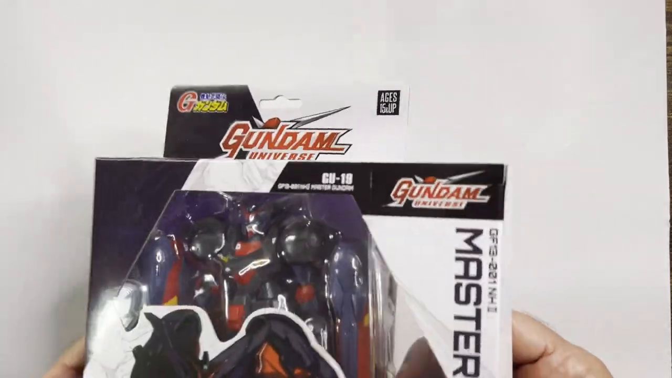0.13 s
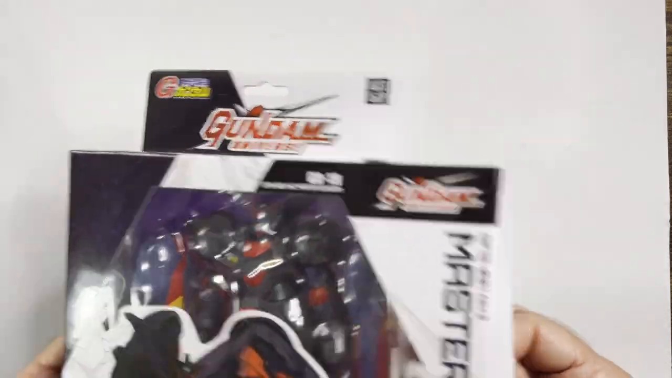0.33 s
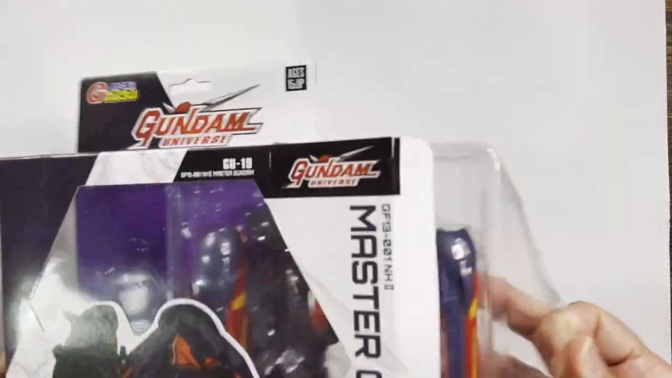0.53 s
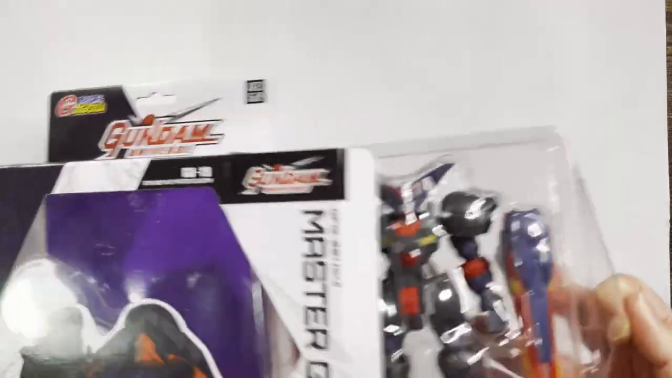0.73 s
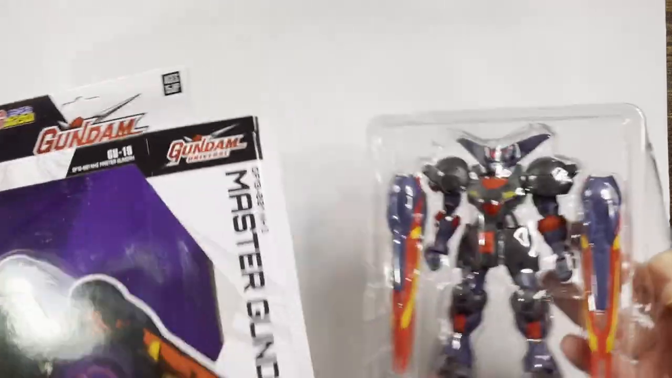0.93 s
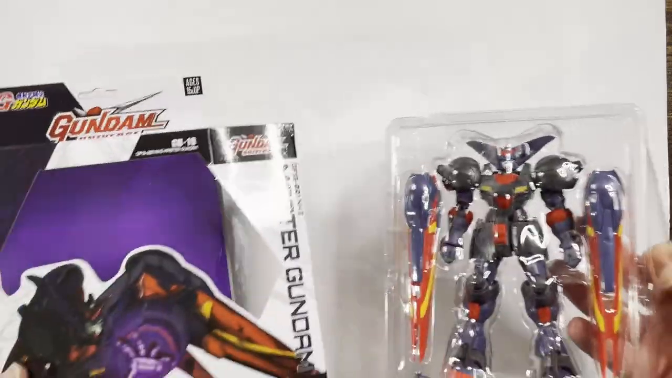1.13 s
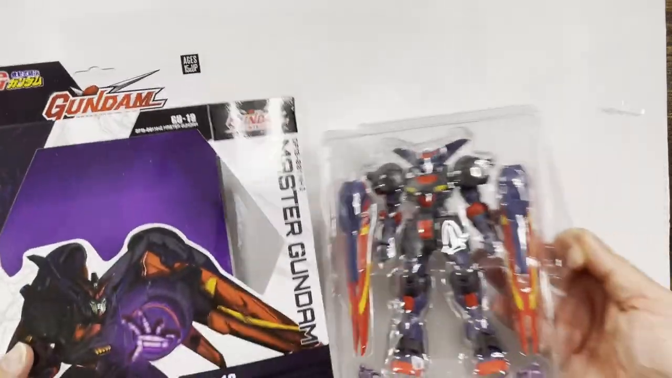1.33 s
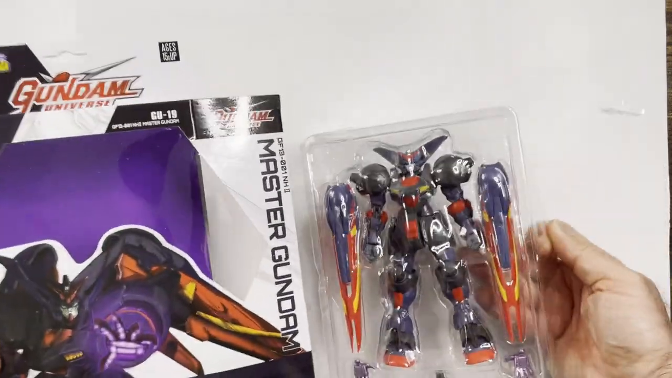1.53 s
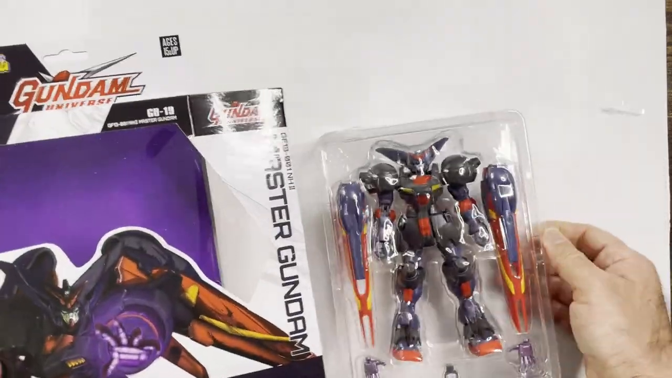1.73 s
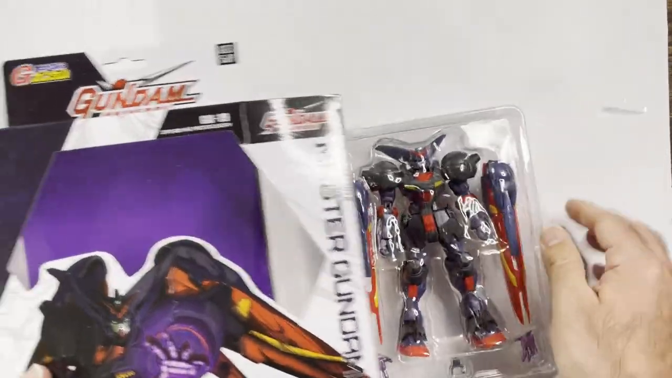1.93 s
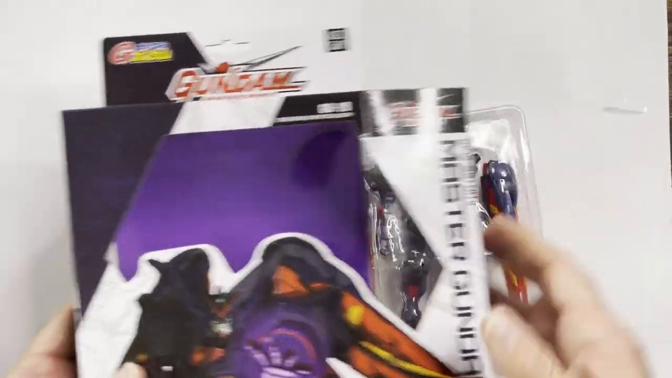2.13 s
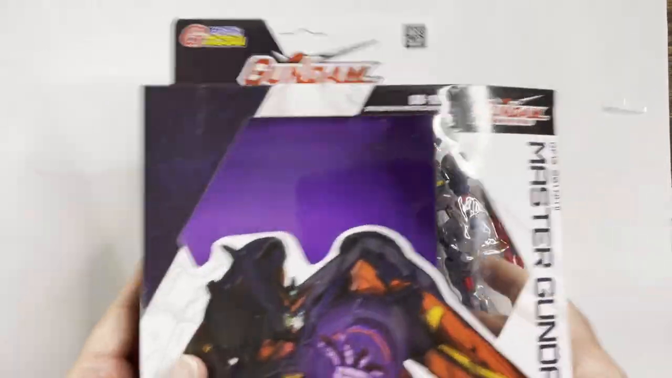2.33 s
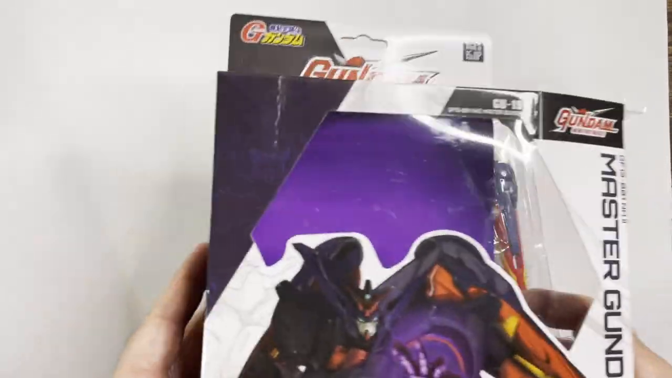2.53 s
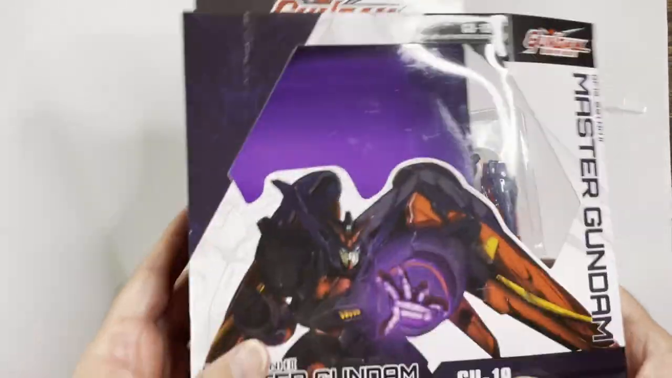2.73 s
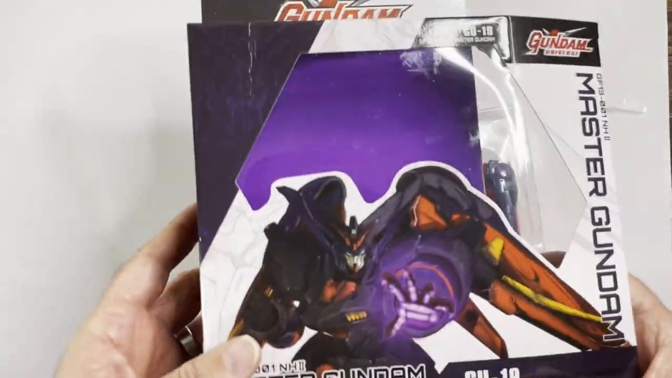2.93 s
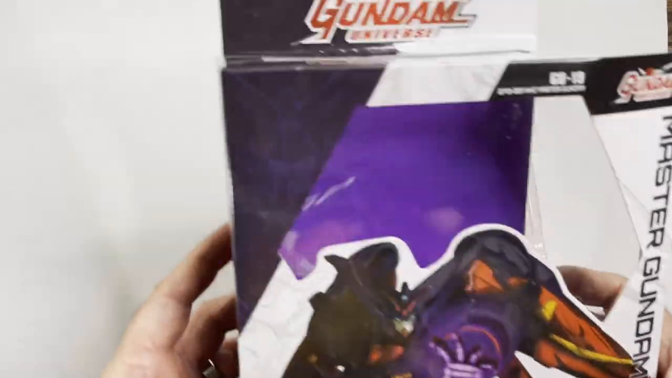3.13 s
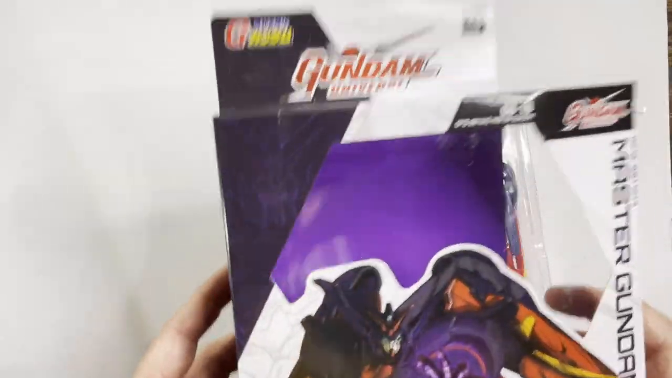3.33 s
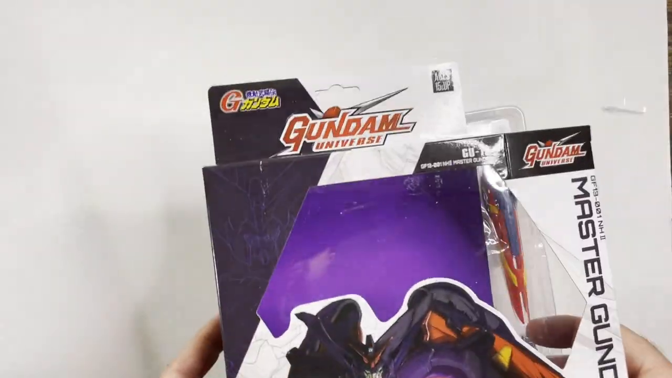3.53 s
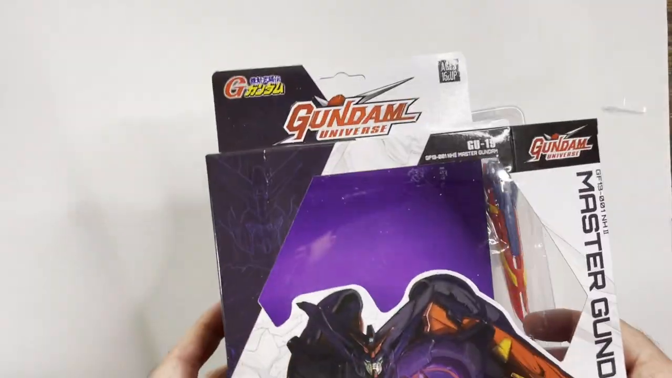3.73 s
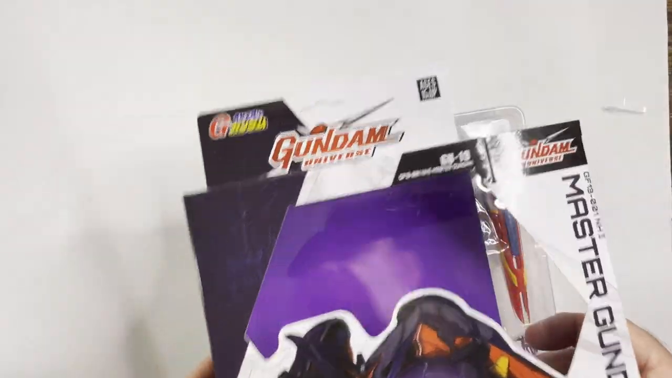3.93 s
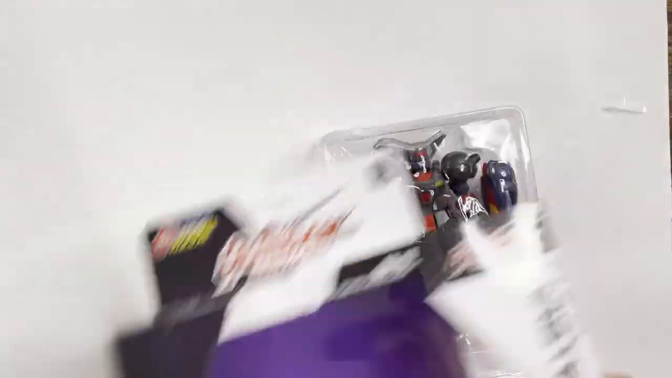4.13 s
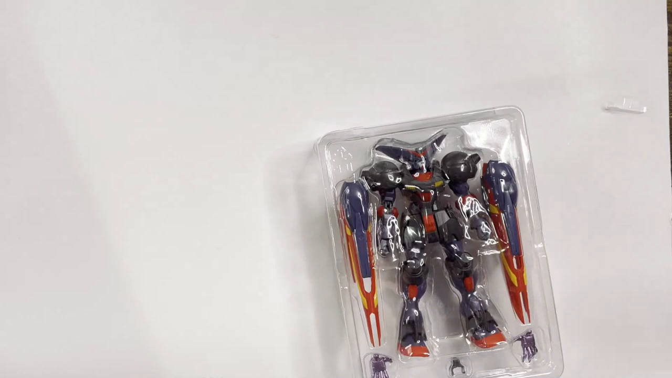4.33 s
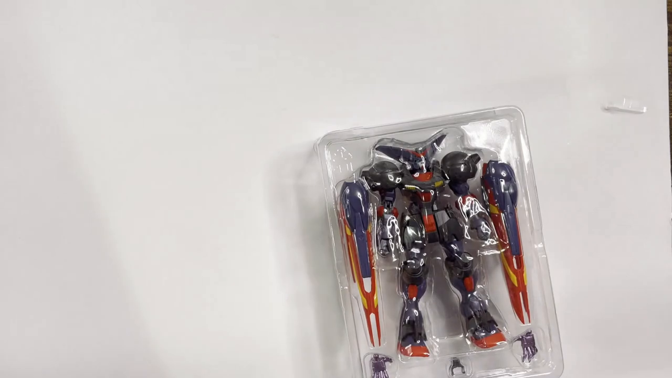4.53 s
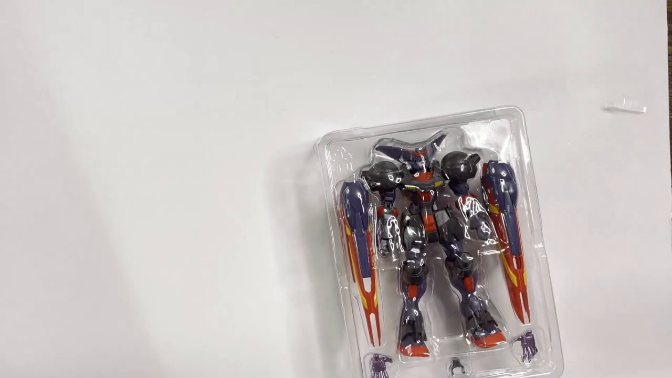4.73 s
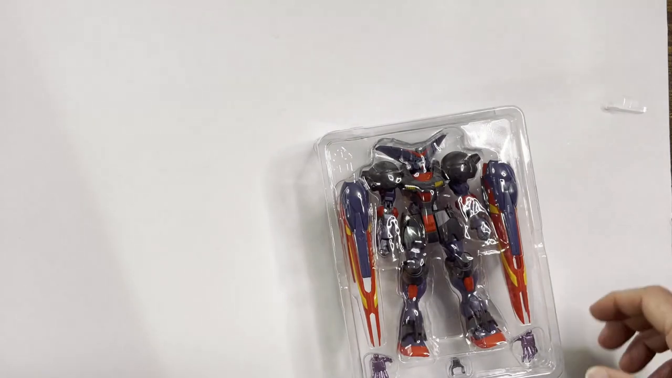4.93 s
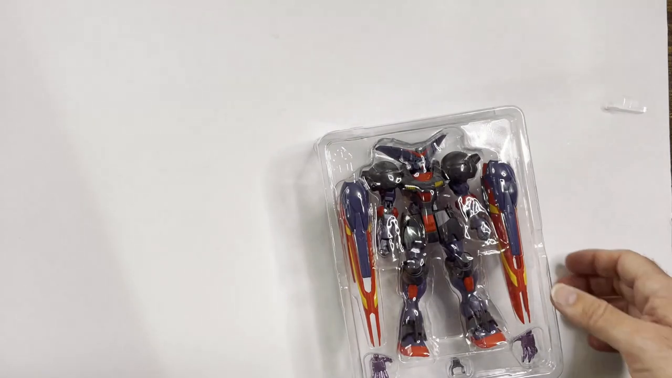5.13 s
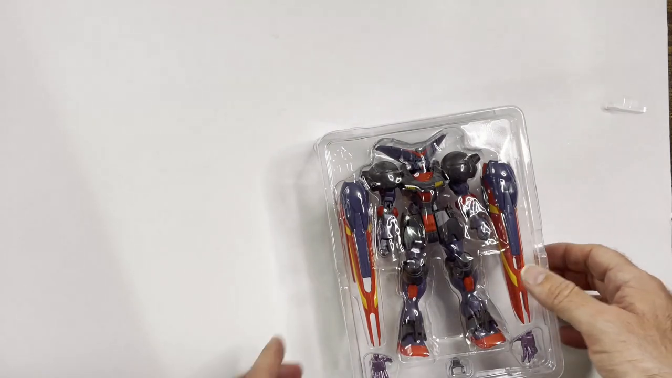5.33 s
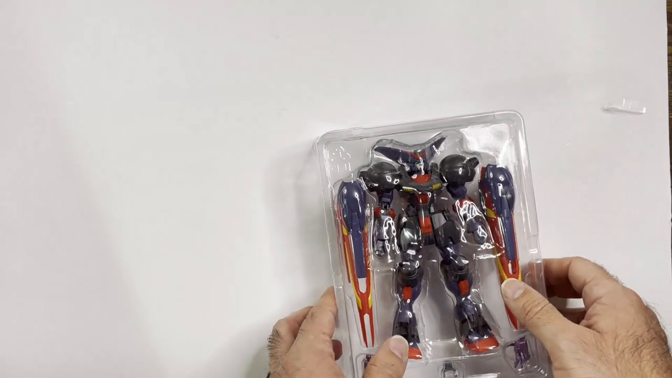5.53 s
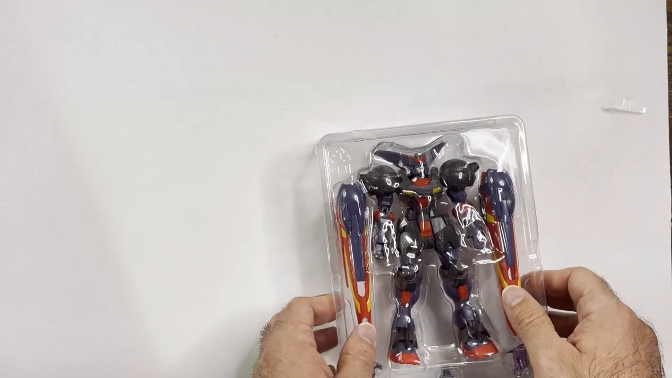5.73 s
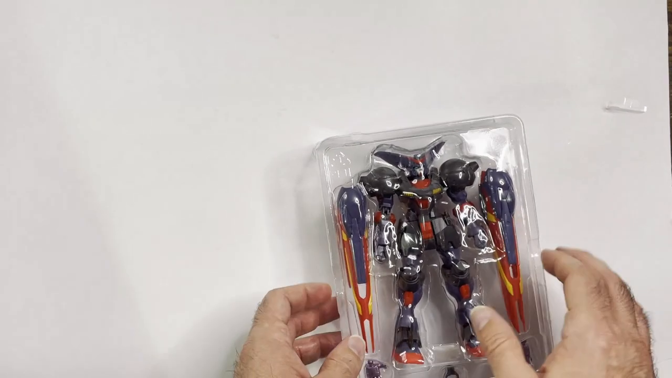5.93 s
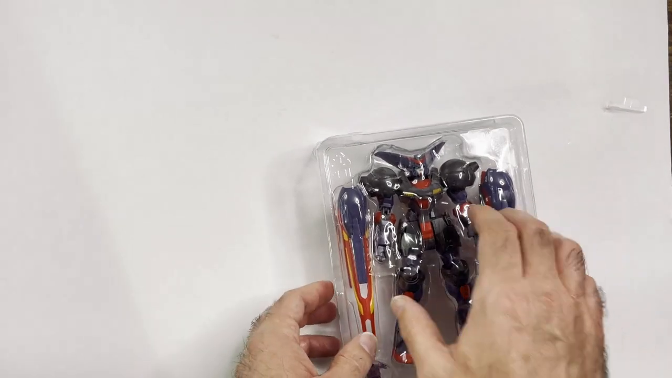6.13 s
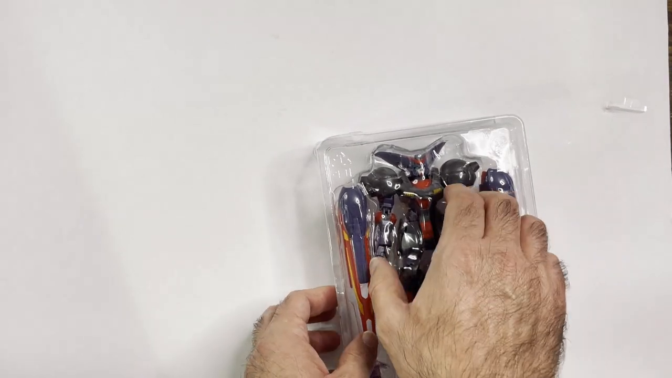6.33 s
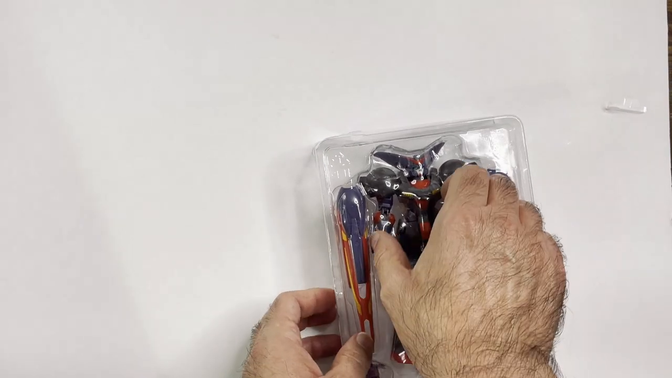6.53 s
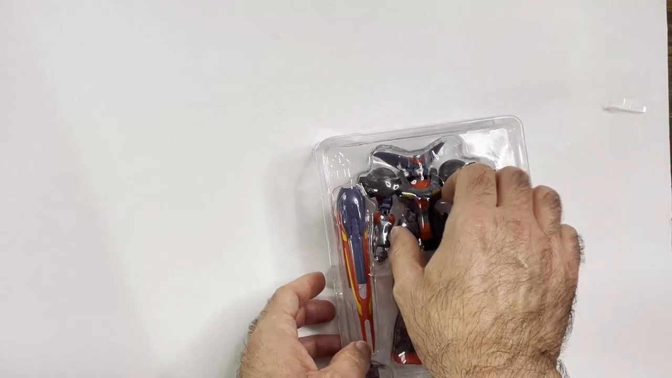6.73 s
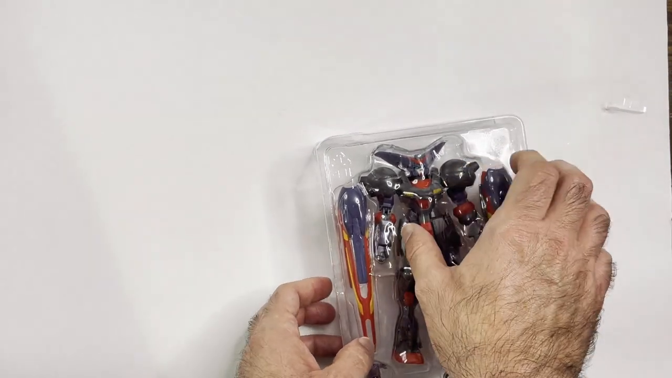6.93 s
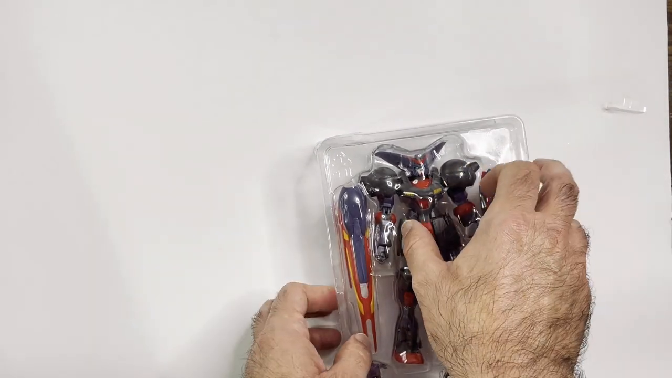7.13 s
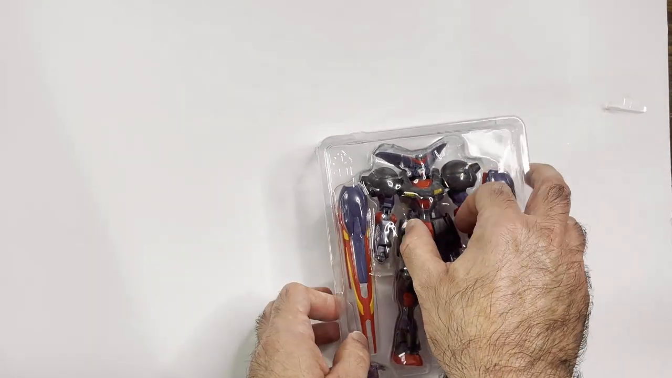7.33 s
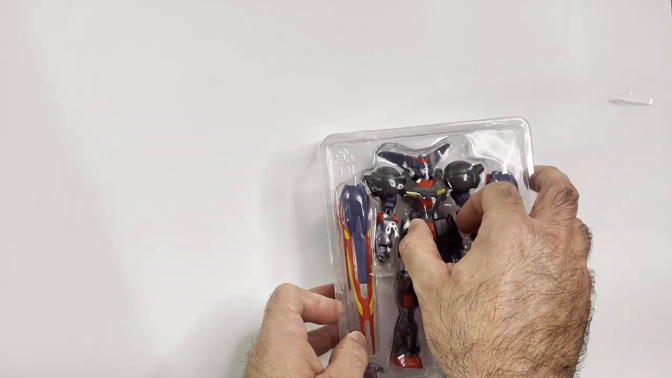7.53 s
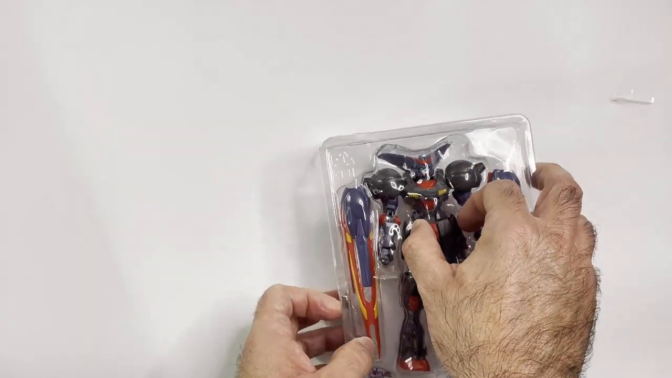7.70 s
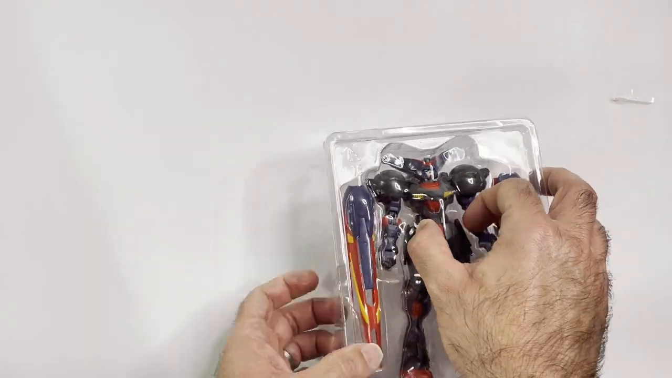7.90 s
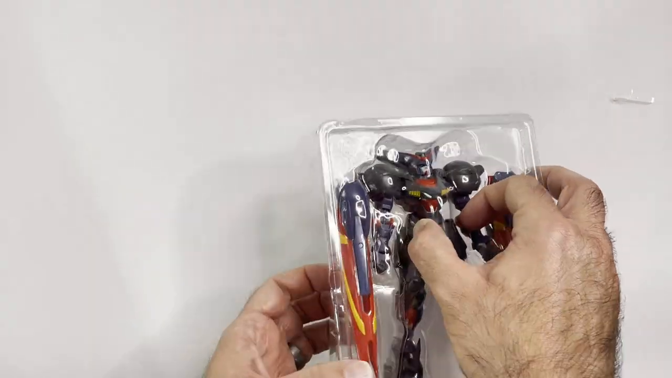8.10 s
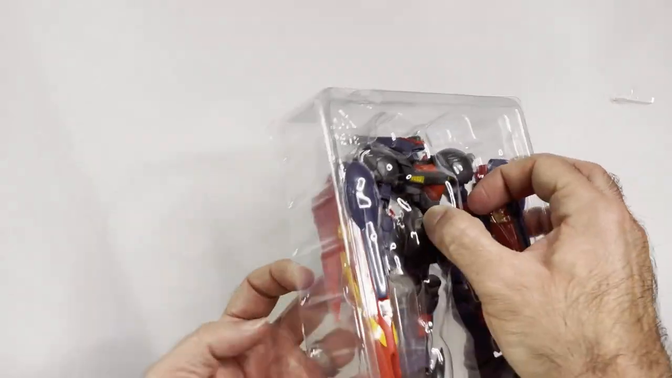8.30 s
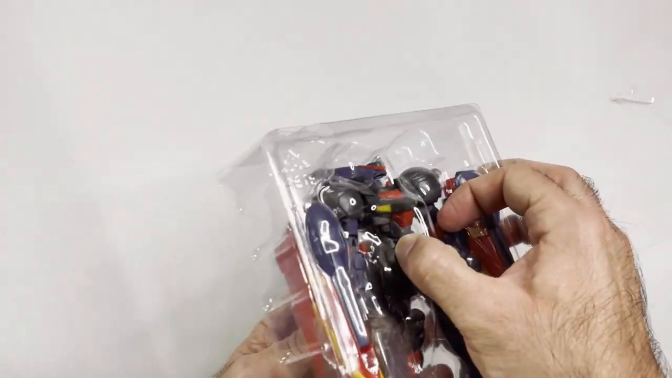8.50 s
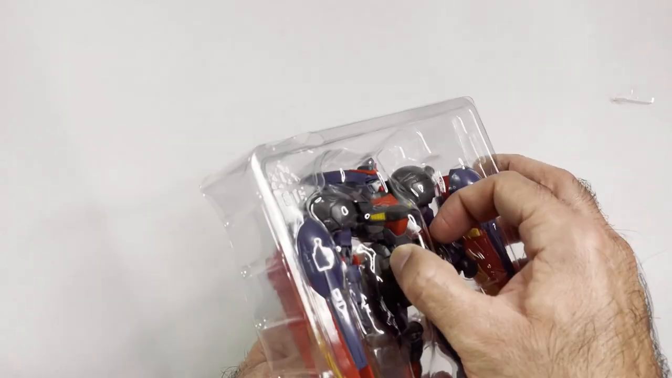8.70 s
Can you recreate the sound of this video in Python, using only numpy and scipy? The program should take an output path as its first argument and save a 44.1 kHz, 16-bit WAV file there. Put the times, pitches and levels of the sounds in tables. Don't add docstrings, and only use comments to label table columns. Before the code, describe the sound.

Loud plastic snaps and crinkles as a thin tray slides from a cardboard box, then quiet box handling, then softer squeezing, popping and ticking.

```python
import sys
import numpy as np
from scipy import signal
from scipy.fft import rfft, irfft, next_fast_len
from scipy.io import wavfile
from scipy.ndimage import uniform_filter1d

SR = 44100
rng = np.random.default_rng(int(sys.argv[2]) if len(sys.argv) > 2 else 0)


def generate_wav(signal):
    frames = np.transpose(np.atleast_2d(signal))
    scaled = np.clip(frames, -1, 1) * 32767
    pcm = np.round(scaled).astype(np.int16)
    wavfile.write(sys.argv[1], SR, pcm)


def convert_level_to_amplitude(level_db):
    exponent = np.asarray(level_db, float) / 20
    return 10 ** exponent


N = 390726
TIME = np.arange(N) / SR
RISE_S = .0016

# (time [s], peak level [dB], ring pitch [Hz], crack level re peak [dB])
PULL_SNAPS = [(0.005, -1.5, 1700, -16), (0.1175, 0, 1255, -25), (0.304, -0.5, 1200, -5),
              (0.394, -12.5, 467, -23), (0.525, -6, 670, -17), (0.555, -7, 718, -11.5),
              (0.621, -18.5, 1020, -24.5), (0.658, -12, 1360, -18), (0.706, -13, 1402, -28.5),
              (0.764, 0.5, 1451, -27.5), (0.812, -16.5, 435, -23), (0.909, -4, 528, -21.5),
              (1.059, -28.5, 3800, -11), (1.124, -27.5, 3920, -9.5), (1.146, -29.5, 4240, -11),
              (1.337, -30.5, 1930, -18), (1.355, -12.5, 2570, -23), (1.497, -19, 1813, -9.5),
              (1.581, -18.5, 1850, -24), (1.618, -18, 1760, -11.5), (1.67, -11, 770, -25.5),
              (1.733, -16.5, 1320, -14), (1.855, -12, 1060, -13.5), (1.924, -10.5, 730, -17.5),
              (1.955, -11.5, 548, -11.5)]
# (time [s], peak level [dB], ring pitch [Hz], crack level re peak [dB])
BOX_TAPS = [(2.243, -35.5, 2030, -18.5), (2.266, -58, 773, -36.5), (2.358, -33, 698, -12),
            (2.592, -47, 950, -34), (2.712, -34, 740, -36.5), (2.756, -41, 690, -31),
            (2.917, -37, 700, -10), (3.114, -49, 690, -20.5), (3.218, -32.5, 652, -10.5),
            (3.406, -44.5, 2170, -10), (4.04, -37, 448, -11), (4.139, -40.5, 514, -18.5),
            (4.216, -44, 2290, -28)]
# (time [s], peak level [dB], ring pitch [Hz], crack level re peak [dB])
GRIP_SNAPS = [(4.965, -12.5, 663, -15.5), (5.376, -33, 822, -13), (5.458, -45, 527, -29.5),
              (5.62, -33, 1880, -18), (5.662, -39, 780, -6.5), (5.704, -29.5, 560, -48),
              (5.834, -28.5, 880, -25), (5.887, -10, 780, -16.5), (6.138, -27, 792, -20.5),
              (6.152, -21.5, 724, -16.5), (6.296, -29, 655, -40), (6.342, -31, 756, -30.5),
              (6.475, -38, 610, -13.5), (6.613, -35.5, 458, -36.5), (6.627, -35, 1210, -22),
              (6.832, -26.5, 1156, -22), (6.934, -25.5, 764, -22)]
# (time [s], peak level [dB], ring pitch [Hz], crack level re peak [dB])
PRISE_SNAPS = [(7.076, -29, 810, -11), (7.138, -22.5, 744, -18.5), (7.21, -27.5, 978, -48),
               (7.303, -25, 600, -27), (7.365, -26.5, 780, -15), (7.433, -29, 780, -18),
               (7.471, -38, 773, -16), (7.527, -31.5, 870, -17), (7.663, -21.5, 996, -29),
               (7.804, -37.5, 821, -22), (7.858, -34.5, 1239, -23), (7.904, -36.5, 795, -29),
               (7.953, -23.5, 1066, -23), (8.006, -30, 810, -18), (8.059, -17.5, 1180, -26),
               (8.078, -17, 1802, -26), (8.222, -25.5, 580, -21), (8.269, -28, 650, -13.5),
               (8.288, -30.5, 427, -14.5), (8.335, -33, 737, -15), (8.428, -23.5, 756, -13.5),
               (8.479, -18.5, 969, -18.5), (8.509, -21.5, 1290, -14), (8.526, -26.5, 660, -25),
               (8.56, -16, 1373, -22), (8.605, -29, 980, -22.5), (8.699, -17.5, 1061, -25)]
# (time [s], peak level [dB], ring pitch [Hz], crack level re peak [dB])
CREASES = [(0.091, -24, 1600, -26), (0.398, -11.5, 2300, -14), (0.447, -17.5, 447, -12),
           (0.452, -20.5, 693, -18), (0.523, -17, 2330, -18), (0.567, -14, 1240, -18),
           (0.746, -19.5, 2510, -9), (0.793, -13.5, 1950, -19), (0.914, -7.5, 975, -15.5),
           (1.066, -29, 3730, -20), (1.409, -30.5, 640, -25), (1.575, -22, 1200, -13.5),
           (3.112, -44.5, 2197, -24), (3.128, -45.5, 2280, -20), (3.143, -49, 2180, -22),
           (3.235, -49, 2300, -22), (3.415, -60, 2314, -18.5), (3.492, -64, 3880, -21),
           (3.5, -65.5, 2295, -22), (3.955, -42, 2927, -17), (5.469, -29, 1030, -21.5),
           (5.597, -37.5, 4700, -8), (5.708, -33, 3200, -20), (5.84, -32, 3000, -11),
           (6.272, -37.5, 770, -19.5), (6.289, -32, 540, -2), (6.307, -36, 696, -18),
           (6.501, -42, 631, -16), (6.86, -31, 794, -22), (7.167, -35, 766, -26), (7.226, -30.5, 1260, -27),
           (7.35, -34.5, 594, -33), (7.565, -33.5, 785, -19), (7.595, -33.5, 630, -22),
           (7.725, -41.5, 764, -19), (7.939, -44, 1210, -25), (8.038, -27.5, 620, -15),
           (8.184, -39.5, 754, -25), (8.38, -40, 705, -29), (8.44, -25, 594, -17),
           (8.677, -29.5, 800, -29.5), (8.737, -31.5, 720, -33.5), (8.754, -31.5, 1726, -24),
           (8.768, -32, 1090, -35.5)]
# (time [s], peak level [dB], ring pitch [Hz], crack level re peak [dB])
BOX_BRUSHES = [(2.39, -42.5, 700, -20.5), (2.536, -63, 672, -19), (2.665, -52, 2316, -23),
               (2.837, -42.5, 695, -19.5), (3.062, -54, 695, -22), (3.09, -45, 707, -23),
               (3.38, -51, 568, -20), (3.49, -53, 662, -14), (3.563, -55, 597, -14),
               (3.903, -68.5, 693, -15), (3.928, -54.5, 735, -24), (3.945, -42.5, 710, -18),
               (3.962, -45, 663, -28), (3.981, -42, 720, -20), (4.011, -46.5, 704, -14),
               (4.175, -46, 695, -23), (4.195, -42.5, 700, -16), (4.725, -52, 686, -20),
               (4.739, -52, 692, -11)]
# (frequency [Hz], level per Hz [dB])
CRACK_COLOUR = [(1760, -34.5), (3000, 1.5), (6610, -12), (7740, -9.5), (11500, -28.5), (13100, -27.5),
                (15500, -19)]


def snaps():
    out = np.zeros(N + 6144)
    buckles(out, PULL_SNAPS, ring_t60=0.072, thud_db=-24.5, width_share=0.24, give_s=0.0019)
    buckles(out, BOX_TAPS, ring_t60=0.053, thud_db=-11, width_share=0.065, give_s=0.0057)
    buckles(out, GRIP_SNAPS, ring_t60=0.082, thud_db=-28.5, width_share=0.17, give_s=0.0024)
    buckles(out, PRISE_SNAPS, ring_t60=0.037, thud_db=-48, width_share=0.16, give_s=0.0028)
    buckles(out, CREASES, ring_t60=0.036, thud_db=-29.5, width_share=.14, give_s=0.0028)
    buckles(out, BOX_BRUSHES, ring_t60=0.051, thud_db=-34, width_share=0.053, give_s=0.0036)
    return out[:N]


def buckles(out, rows, ring_t60, thud_db, width_share, give_s):
    t = np.arange(6144) / SR
    for s, db, hz, crack_db in rows:
        t60 = np.clip(ring_t60 * (580.0 / hz) ** .25, .015, .2)
        clicks = flurry(t, t60, give_s)
        width = max(width_share * hz, 28.)
        patch = [(hz * ratio, width, d) for ratio, d in ((1.001, 13.5), (2.8, -8.5), (.68, 4.0), (2.1, -3.0))]
        body = ring(clicks, patch) + convert_level_to_amplitude(-6.5) * band(clicks, 380, 3000)
        thud = band(clicks * convert_level_to_amplitude(25 * t / t60), 94, 540)
        crack = colour(band(clicks, 3200, 14000), CRACK_COLOUR)
        crack = crack * convert_level_to_amplitude(-75 * t / t60) * np.minimum(t / 0.0022, 1)
        snap = peak(body) + peak(thud, thud_db) + peak(crack, crack_db + 6.5)
        place(out, s, convert_level_to_amplitude(db) * snap)


def flurry(t, t60, give_s):
    fade = convert_level_to_amplitude(-60 * np.maximum(t - give_s, 0) / t60)
    clicks = grains(len(t), 5000, 1.3) * fade * np.minimum(.25 + t / RISE_S, 1)
    clicks[40] += 2.4
    return clicks


# (time [s], peak level [dB], time to fall by about 35 dB [s])
THUDS = [(0.005, -13.5, 0.025), (0.304, -27.5, 0.021), (0.658, -20.5, 0.16), (0.706, -27, .07),
         (0.764, -17.5, 0.19), (2.266, -17.5, 0.038), (2.358, -37.5, 0.13), (2.756, -37, 0.072),
         (3.222, -30, 0.046), (4.138, -31.5, 0.041), (4.965, -16.5, 0.23), (5.22, -33.5, 0.31),
         (5.887, -26, 0.05), (7.365, -31.5, 0.073)]


def thuds():
    out, t = np.zeros(N + 6144), np.arange(6144) / SR
    for s, db, t60 in THUDS:
        t60 = max(t60, .015)
        clicks = flurry(t, t60, give_s=0.0043) * convert_level_to_amplitude(25 * t / t60)
        place(out, s, peak(band(clicks, 130, 680, order=3), db))
    return out[:N]


# (time [s], peak level [dB], ring pitch [Hz])
FULL_POPS = [(0.489, -17.5, 1171), (0.679, -17, 1480), (0.813, -11, 754), (0.839, -17.5, 620),
             (1.582, -18.5, 1960), (1.864, -20, 623.4), (1.877, -23, 519), (1.955, -12.5, 506),
             (1.989, -21.5, 978), (2.019, -26.5, 1250), (6.884, -33.5, 523), (7.389, -36, 806),
             (7.534, -34.5, 834), (8.444, -27, 558), (8.849, -34.5, 1480)]
# (time [s], peak level [dB], ring pitch [Hz])
HIGH_POPS = [(3.22, -48, 2830), (4.2181, -43, 3350), (5.456, -31.5, 2620), (5.6187, -38, 4560),
             (5.661, -36.5, 5630), (5.8447, -34, 2720), (6.8962, -40, 4470), (6.9692, -39, 4120),
             (7.1868, -35.5, 2590), (7.2414, -29, 2920), (8.4898, -31.5, 2810), (8.7191, -40.5, 2680),
             (8.7552, -39.5, 3510)]
# (time [s], peak level [dB], ring pitch [Hz])
EDGES = [
    (0.006, -8, 4360),
    (0.1185, -8, 4010),
    (2.2395, -25, 2060),
]


def pops():
    out, t = np.zeros(N + 2048), np.arange(2048) / SR
    for s, db, hz in list(FULL_POPS) + list(HIGH_POPS) + list(EDGES):
        t60 = 14. / hz * (1 + hz / 1500.)
        clicks = grains(len(t), 4000, 2.5) * convert_level_to_amplitude(-60 * t / t60) * np.minimum(t / RISE_S, 1)
        pop = band(clicks, 0.96 * hz, 1.0 * hz, order=1) + convert_level_to_amplitude(-13.5) * band(clicks, 0.38 * hz, 1.7 * hz)
        place(out, s, peak(pop, db))
    return out[:N]


# (frequency [Hz], width [Hz], level [dB])
TRAY = [(393, 370, 12), (1239, 250, 7.5), (1400, 58, 2.5), (2120, 75, -1.5), (2413, 140, -20)]
# (frequency [Hz], width [Hz], level [dB])
BOX = [(694, 24, 6), (2200, 420, -9), (2870, 200, -14)]
# (start [s], end [s])
BOX_SPAN = (2.2, 4.9)


def rubbing():
    grip = walk(55)
    slips = grains(N, 3000, 2.5) * convert_level_to_amplitude(4. * grip)

    patches = 0
    for hz in np.geomspace(500, 2600, num=9):
        patch = level(band(slips, hz / 1.12, hz * 1.12, order=1), -2.5 * np.log2(hz / 500))
        patches = patches + convert_level_to_amplitude(10. * np.tanh(walk(16))) * patch
    tray = level(ring(slips, TRAY), -1.4) + level(patches)

    corners = np.add(np.repeat(BOX_SPAN, 2), [0.0244, 0.067, 0.0027, 0.021])
    in_hands = np.interp(TIME, corners, [0, 1, 1, 0])
    hollow = in_hands * level(ring(slips, BOX), 3.)
    body = level(band(tray, 610, 2700), -7.5) + level(crackle(), -12.0) + hollow
    boom = level(band(slips, 210, 760), -2.0) * convert_level_to_amplitude(0.58 * walk(24))

    smooth = rng.standard_normal(N) * slips.std() * convert_level_to_amplitude(3. * grip)
    sheet = level(band(.25 * slips + smooth, 3200, 7200) * convert_level_to_amplitude(3.5 * walk(50)), -3.)
    skin = level(band(smooth, 7200, 19000, order=3) * convert_level_to_amplitude(3.2 * walk(40)), -1.5)

    panels = 0
    for hz in np.geomspace(3300, 6600, num=6):
        panels = panels + convert_level_to_amplitude(9. * np.tanh(walk(30))) * band(sheet, hz / 1.08, hz * 1.08, order=1)
    sheet = level(sheet + panels, -3.)
    return sum(gain * layer for gain, layer in zip(strokes(), (body, boom, sheet, skin)))


# (peak time [s], swell [s], fade [s], level [dB], brightness [dB])
PULL_RUBS = [(0.495, 0.12, .08, -24, -11.5), (0.79, 0.045, .2, -29.5, -6), (0.025, .02, .3, -35.5, -7),
             (1.52, 0.058, .3, -42, -6.5), (0.008, 0.096, .06, -19.5, -25.5), (0.13, 0.073, .2, -30, -20.5),
             (0.305, 0.023, 0.23, -27, -3), (0.40, 0.045, .4, -24.5, -13), (0.511, 0.46, 0.39, -20.5, -17),
             (0.68, 0.63, .3, -28, -10.5), (0.818, 0.17, 0.11, -20, -14), (0.925, 0.036, .07, -22.5, -16),
             (1.143, 0.33, 0.12, -50, -1.5), (1.356, 0.028, 0.25, -28.5, -21.5),
             (1.42, 0.048, .15, -32.5, -14), (1.581, 0.024, .3, -26.5, -23.5), (1.70, 0.15, .5, -34, -7.5),
             (1.86, 0.12, 0.22, -34, -11), (1.968, 0.21, 0.17, -22.5, -15)]
# (peak time [s], swell [s], fade [s], level [dB], brightness [dB])
BOX_RUBS = [(2.39, .1, 0.092, -58, 1.5), (2.53, 0.185, 0.13, -71, -1.5), (4.48, 0.32, .25, -83, 12.5),
            (2.6, 0.025, 0.32, -65.5, 2.5), (2.712, 0.043, 0.43, -55.5, -1), (2.936, 0.115, 0.18, -65, -1),
            (3.13, 0.13, 0.275, -56, -9), (3.235, 0.16, 0.18, -60, -16), (3.417, 0.08, 0.051, -53.5, -14.5),
            (3.948, 0.11, 0.26, -60, -3), (4.12, 0.3, 0.25, -63, 4.5), (4.746, 0.12, 0.16, -75.5, 1)]
# (peak time [s], swell [s], fade [s], level [dB], brightness [dB])
GRIP_RUBS = [(4.975, .015, 0.5, -53, 3.5), (5.61, 0.033, 0.057, -50.5, 7.5), (5.712, .012, .07, -49.5, 3.5),
             (5.845, .03, 0.0501, -50.5, 0), (7.285, .07, .08, -53, 4.5), (6.98, 0.072, 0.037, -47.5, 6),
             (5.98, .1, 0.027, -46.5, 3.5), (8.148, 0.092, .03, -58, 4), (4.97, 0.029, 0.23, -22.5, -33),
             (5.47, 0.05, 0.32, -33.5, -16), (5.72, .02, 0.2, -54.5, -6.5), (5.906, .15, 0.24, -38.5, -7),
             (5.981, 0.31, 0.081, -33, -11), (6.157, 0.06, 0.32, -39.5, -20.5),
             (6.307, 0.14, 0.16, -48, -13), (6.492, 0.096, 0.37, -48.5, -9.5),
             (6.633, 0.6, 0.19, -47.5, -26), (6.88, 0.081, 0.3, -38.5, -6.5),
             (6.978, 0.353, 0.059, -43, -12.5), (7.229, 0.52, 1, -39.5, -17.5),
             (7.681, 0.79, 0.24, -45.5, -28), (7.97, .12, 0.31, -48, -16), (8.08, 0.045, 0.1, -34.5, -20.5),
             (8.285, 0.16, 0.074, -33, -30.5), (8.438, 0.052, 0.46, -32.5, -17.5),
             (8.698, 0.12, .5, -43, -18.5), (8.85, 0.81, .3, -41.5, -20)]
# (peak time [s], swell [s], fade [s], level [dB], brightness [dB])
SKIN_RUBS = [
    (4.19, 0.17, 0.098, -64, 0),
    (6.48, .02, .08, -52.5, 0),
]


def strokes():
    t, power = TIME[::64], 0

    def shape(s, swell, fade):
        return -30 * np.maximum((s - t) / max(swell, .005), (t - s) / max(fade, .005))

    # (strokes, boom re stroke [dB], boom fade stretch, skin hiss re sheet [dB])
    kinds = [(PULL_RUBS, -6, 1.31, -2.5), (BOX_RUBS, -0.36, 0.98, -2),
             (GRIP_RUBS, -1.1, 1.18, -0.44), (SKIN_RUBS, -6., 1.1, 10.)]
    for rows, boom_db, lingers, skin_db in kinds:
        for s, swell, fade, db, bright_db in rows:
            body = shape(s, swell, fade * 0.81)
            boom = boom_db + shape(s, swell, fade * lingers)
            sheet = bright_db + shape(s, swell, fade * 0.82)
            skin = bright_db + skin_db + shape(s, swell, fade * 0.86)
            power = power + convert_level_to_amplitude(2 * (db + np.array([body, boom, sheet, skin])))
    return [np.interp(TIME, t, np.sqrt(p)) for p in power]


def crackle():
    out = 0
    for hz in np.geomspace(480, 2700, num=12):
        bursts = signal.lfilter([1], [1, -.988], grains(N, 30, 4.)) * rng.standard_normal(N)
        patch = band(bursts, 0.9 * hz, 1.11 * hz, order=1) + convert_level_to_amplitude(-16.5) * band(bursts, 320, 2500, order=1)
        out = out + level(patch, -3.5 * np.log2(hz / 480))
    return level(band(out, 250, 3600))


# (start time [s], end time [s], pitch [Hz], level [dB])
SQUEAKS = [(5.472, 5.545, 5700, -49), (5.51, 5.54, 5300, -51), (5.732, 5.74, 10850, -52),
           (5.753, 5.762, 10700, -53), (5.46, 5.58, 1060, -43), (5.662, 5.667, 5650, -54),
           (5.728, 5.765, 5620, -41), (5.752, 5.764, 5370, -49), (5.77, 5.82, 5520, -59),
           (7.212, 7.226, 5650, -53), (7.328, 7.331, 5600, -53), (7.366, 7.372, 5700, -48),
           (5.475, 5.56, 530, -36), (5.712, 5.75, 590, -43), (3.325, 3.345, 2150, -65),
           (3.34, 3.362, 2330, -66), (3.395, 3.415, 2250, -60), (3.225, 3.25, 2280, -62)]


def squeaks():
    out, slips = np.zeros(N), rng.standard_normal(N) * convert_level_to_amplitude(1.2 * walk(110))
    for a, b, hz, db in SQUEAKS:
        span = slice(int(a * SR) - 2000, int(b * SR) + 2000)
        gate = np.clip(np.minimum(TIME[span] - a, b - TIME[span]) / .006 + 1, 0, 1)
        rib = (hz, 30 + .004 * hz, 0)
        octave = (min(2 * hz, 15000), .1 * hz, -30 + min(hz, 6000) / 800)
        out[span] += gate * level(ring(slips[span], [rib, octave]), db)
    return out


# (time [s], peak level [dB])
TICKS = [(0.4436, -30.5), (0.5614, -15.5), (0.582, -28.5), (0.6425, -31), (0.836, -22), (0.926, -29.5),
         (1.6877, -28.5), (1.9131, -34.5), (5.139, -55), (5.412, -57), (6.364, -47.5), (6.574, -44),
         (6.8753, -29.5), (7.2639, -42.5), (7.29, -36), (8.148, -45), (0.9355, -23), (1.0875, -38),
         (6.2367, -42.5), (6.4775, -28.5), (6.537, -40), (7.1848, -36), (7.241, -45), (7.972, -42),
         (8.4911, -34)]


def ticks():
    out, t = np.zeros(N + 512), np.arange(512) / SR
    for s, db in TICKS:
        tick = band(rng.standard_normal(len(t)) * convert_level_to_amplitude(-60 * t / 0.015), 4200, 15500)
        place(out, s, peak(tick, db))
    return out[:N]


def room(x):
    t = np.arange(SR // 2) / SR
    cloud = rng.standard_normal((3, len(t))) * np.clip((t - .003) / 0.0099, 0, 1)
    dull = band(cloud[:2], 60, 3300, order=1) * convert_level_to_amplitude(-60 * t / 0.31)
    bright = band(cloud[2] + 1.4 * cloud[:2], 4200, 11000, order=1) * convert_level_to_amplitude(-60 * t / 0.35)
    tail = (dull + convert_level_to_amplitude(-10) * bright) / np.sqrt(np.sum(dull ** 2) / 2)
    return signal.fftconvolve(x[None], tail, axes=1)[:, :N] * convert_level_to_amplitude(-15.5)


# (frequency [Hz], lead of the left [radians])
PORT_PHASE = [(0, 0), (1500, .1), (2500, .45), (5200, .35), (6550, -.8), (7300, -2.4), (8250, -3.14),
              (11400, -6.3), (12100, -6.5), (14200, -9.1), (15500, -9.45)]
# (frequency [Hz], left minus right [dB])
PORT_BALANCE = [(100, 1.5), (300, 0), (1000, .8), (1700, .2), (2400, 1.7), (5000, 3.2), (8250, .2),
                (12000, -.2), (13500, 1.5)]


def ports(x):
    size = next_fast_len(N)
    hz = np.arange(size // 2 + 1) * SR / size
    turn = np.interp(hz, *np.transpose(PORT_PHASE)) * .5j
    tilt = np.interp(hz, *np.transpose(PORT_BALANCE)) * np.log(10) / 40
    return irfft(rfft(x, size) * np.exp(np.array([turn + tilt, -turn - tilt])), size)[:, :N]


# (frequency [Hz], level per Hz [dB])
HUM = [(21, -30.5), (35, -2.5), (86, 0.5), (102, -10.5), (129, -1.5), (150, -27.5), (177, -16.5),
       (200, -24), (260, -45.5), (440, -120)]
# (frequency [Hz], level per Hz [dB])
AIR = [(88, -37.5), (150, -1.5), (462, -10), (695, -15.5), (827, -27), (2230, -26.5), (3160, -32),
       (15500, -38.5)]
# (time [s], peak level [dB])
THUMPS = [(0.01, -38), (0.396, -31), (0.518, -38), (0.674, -34), (1.955, -36.5), (2.257, -45),
          (2.369, -44.5), (2.927, -46), (4.974, -38), (5.898, -41.5), (6.148, -46), (8.425, -42)]


def background():
    noise, side = rng.standard_normal((4, N)), np.array([[1], [-1]])
    hum = level(colour(noise[0] * (1 + 0.05 * side) + 0.24 * noise[1] * side, HUM))
    hum = band(hum, 38, 400, order=3)
    t, knocks = TIME[::64], 0
    for s, db in THUMPS:
        after = t - s - .02
        knocks = knocks + convert_level_to_amplitude(db) * np.exp(-np.abs(after) / np.where(after < 0, .012, .05))
    knocks = np.interp(TIME, t, knocks)
    air = colour(noise[2] + 0.41 * noise[3] * side, AIR) * convert_level_to_amplitude(1.6 * walk(4))
    return hum * (convert_level_to_amplitude(-54.5 + 1.1 * walk(2.7)) + knocks) + level(air, -69.5)


def level(x, db=0):
    return x * convert_level_to_amplitude(db) / np.sqrt(np.mean(x ** 2))


def peak(x, db=0):
    return convert_level_to_amplitude(db) * x / np.abs(x).max()


def place(out, s, sound):
    start = int(s * SR)
    out[start:start + len(sound)] += sound


def colour(x, table):
    hz, db = np.transpose(table)
    size = next_fast_len(x.shape[-1])
    at = np.log(np.arange(size // 2 + 1) * SR / size + 1)
    return irfft(rfft(x, size) * convert_level_to_amplitude(np.interp(at, np.log(hz), db)), size)[..., :x.shape[-1]]


def band(x, lo_hz, hi_hz, order=2):
    sos = signal.butter(order, [lo_hz, min(hi_hz, .45 * SR)], "bandpass", fs=SR, output="sos")
    return signal.sosfilt(sos, x)


def ring(x, modes):
    out = 0
    for k, (hz, width, db) in enumerate(modes):
        out = out + (-1) ** k * convert_level_to_amplitude(db) * band(x, hz - width / 2, hz + width / 2, order=1)
    return out


def walk(rate):
    k = int(SR / rate)
    held = np.repeat(rng.standard_normal(N // k + 1), k)
    return 1.3 * uniform_filter1d(uniform_filter1d(held, k), k)[:N]


def grains(size, per_s, spread_db):
    slip = rng.random(size) < per_s / SR
    clicks = slip * rng.standard_normal(size)
    boost_db = spread_db * np.minimum(rng.exponential(size=size), 3.5)
    return clicks * convert_level_to_amplitude(boost_db)


def scene():
    hands = snaps() + thuds() + rubbing() + squeaks() + ticks() + pops()
    sway = convert_level_to_amplitude(1.4 * np.tanh(walk(31)) * np.array([[1], [-1]]))
    return ports(hands * sway + room(hands)) + background()


def top_cut(x):
    return signal.sosfilt(signal.butter(12, 15670, fs=SR, output="sos"), x)


def record(dry):
    mix = np.clip(dry, -1, 1)
    return top_cut(mix)


dry = scene()
out = record(dry)
generate_wav(out)
```